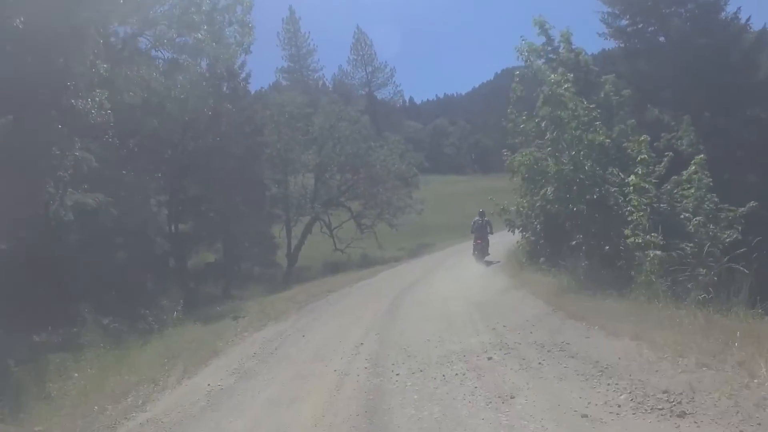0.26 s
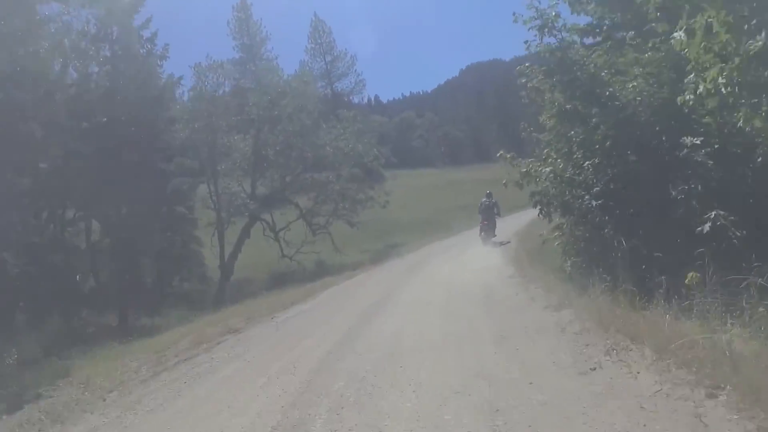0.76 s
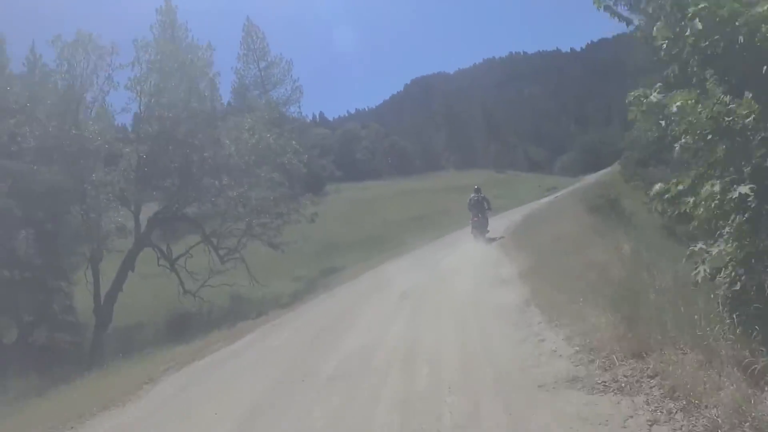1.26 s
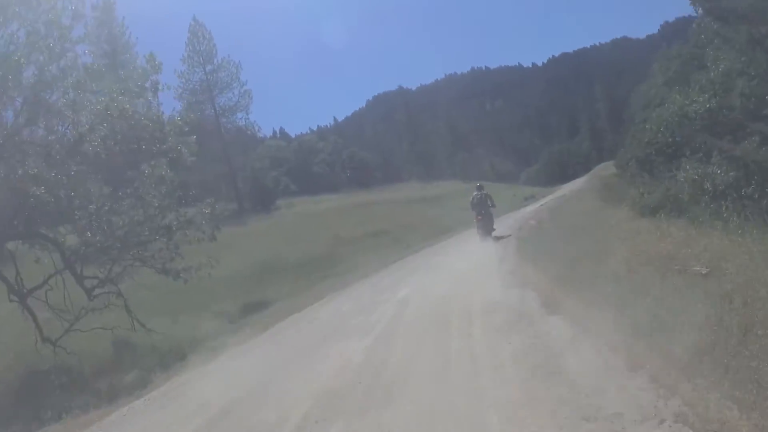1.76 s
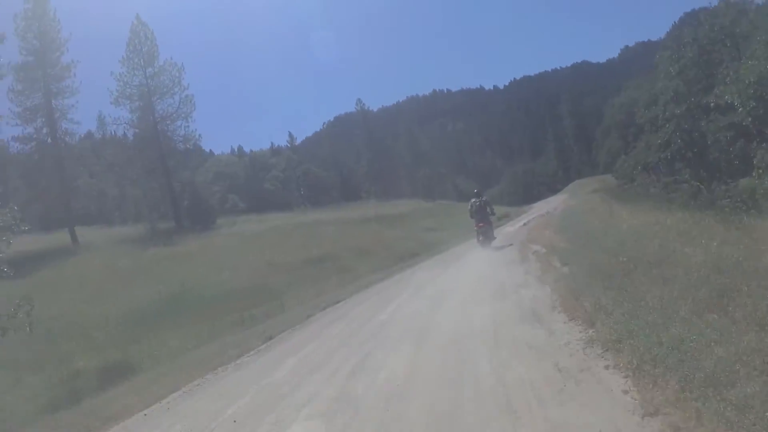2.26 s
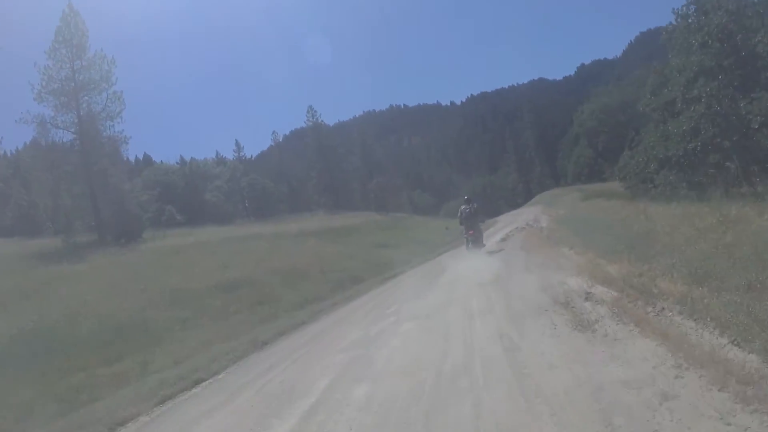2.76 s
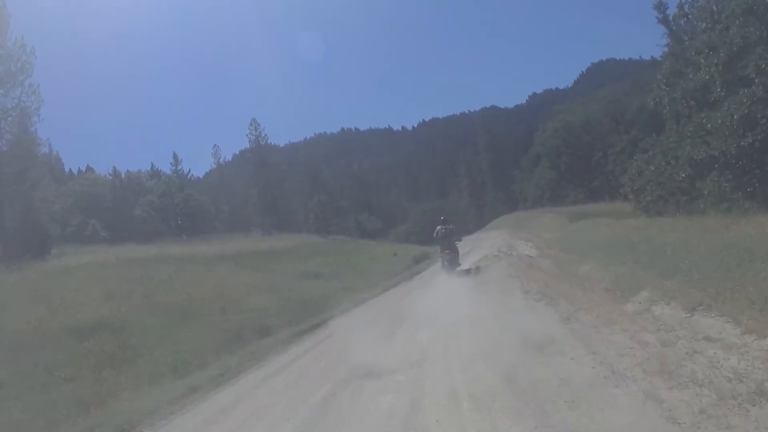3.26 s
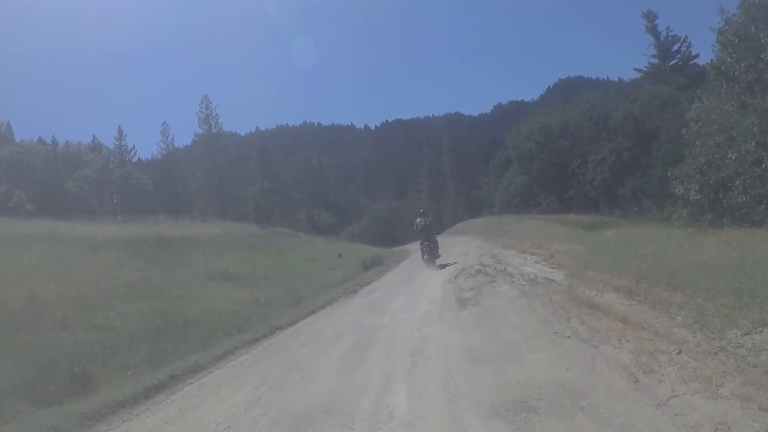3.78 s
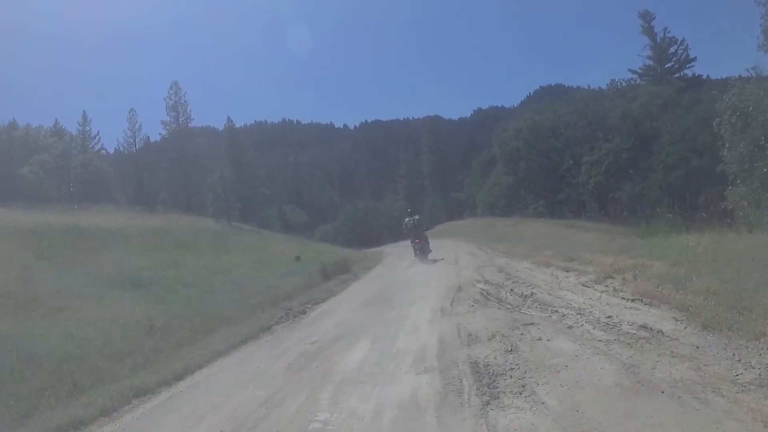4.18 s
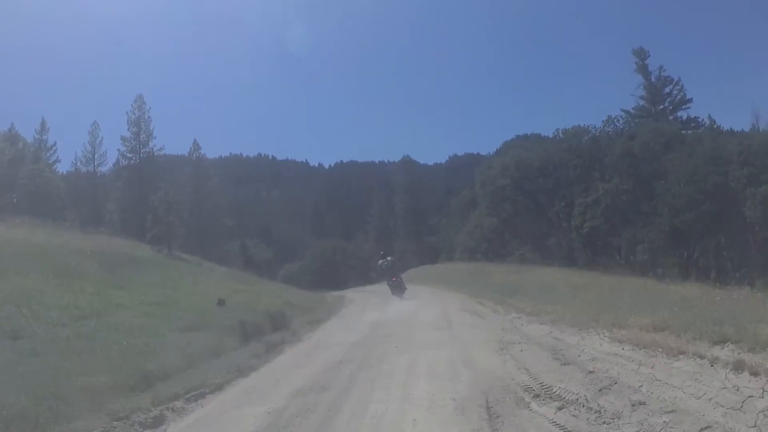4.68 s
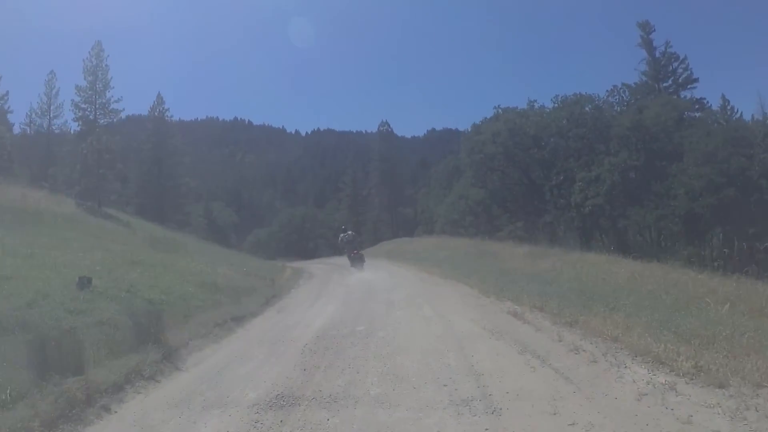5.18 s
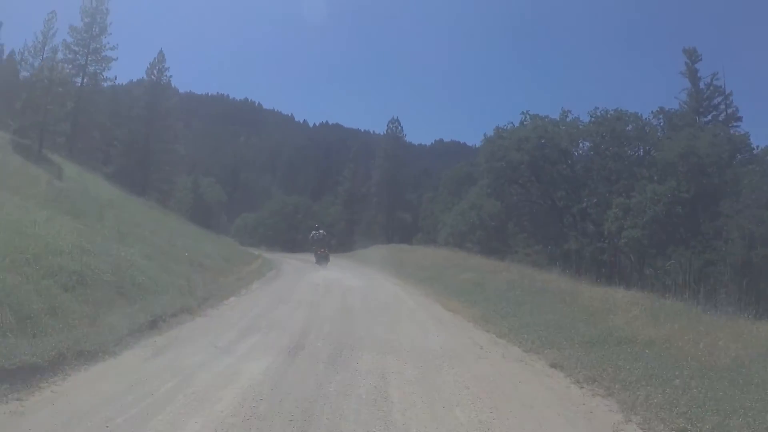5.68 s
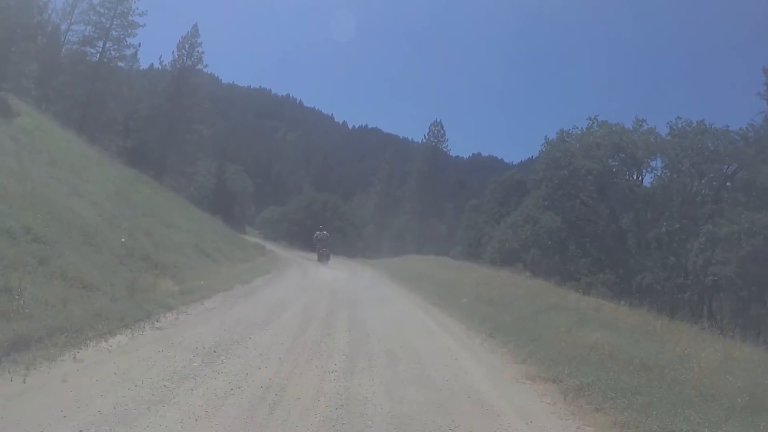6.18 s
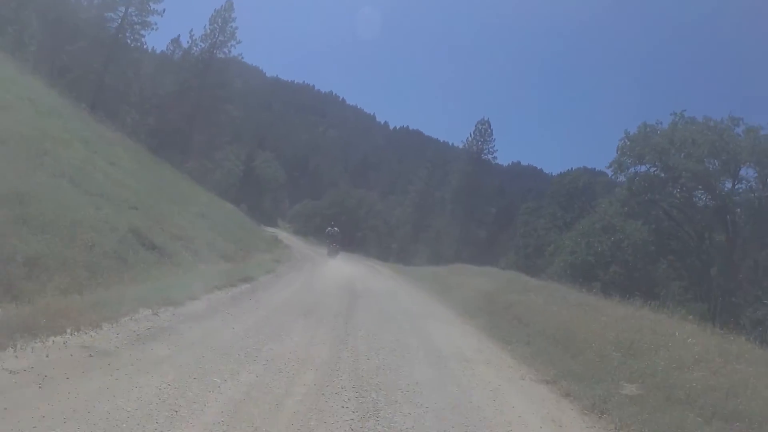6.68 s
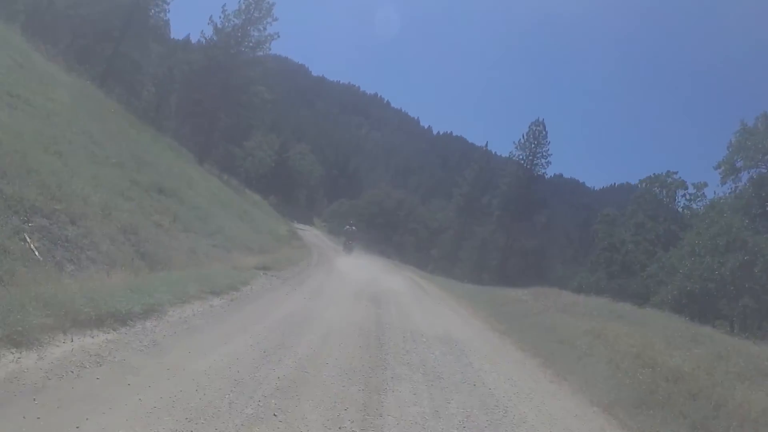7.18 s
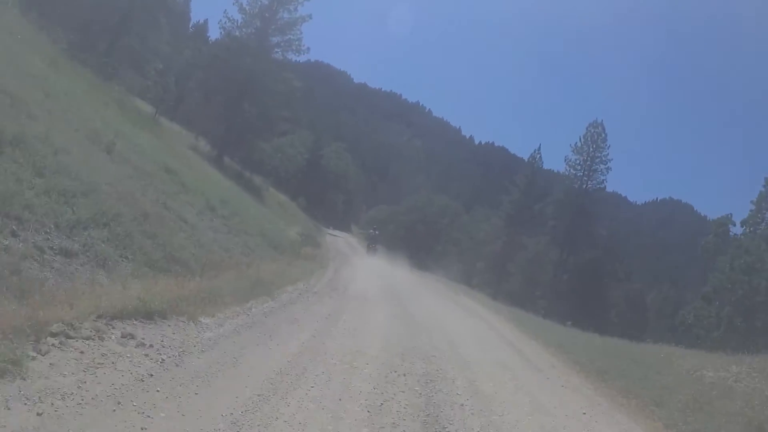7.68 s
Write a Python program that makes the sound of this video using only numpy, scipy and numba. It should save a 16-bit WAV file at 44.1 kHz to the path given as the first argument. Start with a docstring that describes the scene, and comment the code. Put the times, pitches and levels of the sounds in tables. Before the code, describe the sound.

Muffled motorcycle engine drone and low wind buffeting on gravel, constant dry rattling ticks, a few violent bumps, then engine pitch climbing.

```python
"""On a gravel trail, a camera in a closed housing rides on a single-cylinder trail bike.
Wind and frame rumble is shaped noise, stones and bumps are short swings, and the engine is a sum of
crank orders with a gear whine. Loud bumps make a gain control duck and creep back.
Dry ticks, knocks, hoots and short squeaks, made of noise bursts, resonances and chirps, ride on top."""
import sys
import numpy as np
from scipy import signal
from scipy.fft import rfft, irfft, next_fast_len
from scipy.io import wavfile
from scipy.ndimage import uniform_filter1d
from numba import njit

SR = 44100
rng = np.random.default_rng(int(sys.argv[2]) if len(sys.argv) > 2 else 0)


def transcribe(signal):
    """Save signal, clipped to [-1, 1], as a 16-bit WAV file at the path in sys.argv[1]."""
    frames = np.atleast_2d(signal).T
    limited = np.clip(frames, -1, 1)
    pcm = np.round(limited * 32767).astype(np.int16)
    wavfile.write(sys.argv[1], SR, pcm)


N = 350141

# wind buffeting: (time [s], level [dB], relative level of the bands below 50 Hz [dB])
BUFFETING = [(0, -21.5, 9.5), (.65, -18.5, 3), (1.2, -16.5, 6.5), (2.1, -18.5, 5), (3.4, -19.5, 5),
             (3.9, -21.5, 5), (4.3, -20, 2), (4.7, -18.5, 7.5), (5.2, -17.5, 0.5), (5.7, -14, 7.5),
             (6, -16.5, -13), (7.0, -17.5, -6), (7.94, -16.5, -3)]
# ticks at set times, loud and faint: (time [s], level before colouring [dB])
TIMED_TICKS = [(0.0188, -28.5), (0.0542, -41), (0.0675, -32), (0.166, -34), (0.198, -34), (0.2297, -38),
               (0.267, -35), (0.2887, -32), (0.3418, -28.5), (0.407, -29), (0.43, -38), (0.4998, -24.5),
               (0.562, -31), (0.6, -31), (0.6534, -23), (0.682, -37), (0.716, -28.5), (0.7636, -36),
               (0.785, -49), (0.84, -35), (0.8622, -24.5), (0.901, -21), (0.959, -39), (0.9828, -31.5),
               (1.012, -38), (1.037, -58), (1.049, -36), (1.08, -36), (1.122, -31), (1.16, -34),
               (1.213, -22.5), (1.276, -36), (1.3059, -36), (1.324, -40), (1.3448, -34), (1.3682, -25),
               (1.4664, -32.5), (1.491, -39), (1.5568, -25.5), (1.5827, -29), (1.626, -36), (1.6813, -22.5),
               (1.761, -30), (1.7808, -28.5), (1.8335, -30.5), (1.8763, -27), (1.898, -34), (1.9765, -36),
               (2.0113, -29), (2.0807, -31.5), (2.148, -25.5), (2.2395, -31.5), (2.2846, -34), (2.295, -39),
               (2.316, -46), (2.3356, -27), (2.367, -31), (2.392, -28), (2.4164, -41), (2.4405, -49),
               (2.502, -39), (2.6374, -29), (2.7287, -36), (2.773, -29), (2.798, -34.5), (2.8962, -28.5),
               (2.954, -36), (3.03, -35), (3.0485, -32), (3.0708, -32), (3.087, -33), (3.1, -35),
               (3.138, -46), (3.1484, -25.5), (3.2018, -27.5), (3.3053, -33), (3.3582, -28), (3.384, -42),
               (3.4122, -25.5), (3.465, -33), (3.616, -40.5), (3.7345, -32), (3.8607, -34), (3.9635, -40),
               (4.0016, -31), (4.0243, -33.5), (4.0803, -30.5), (4.108, -42), (4.259, -29), (4.3173, -33),
               (4.3503, -33.5), (4.3873, -43), (4.4085, -28.5), (4.44, -24.5), (4.4435, -27.5),
               (4.466, -34), (4.4775, -37), (4.491, -49), (4.54, -36), (4.545, -42), (4.664, -44),
               (4.7025, -24), (4.817, -24.5), (5.4272, -22.5), (5.6043, -23), (5.6095, -39), (0.9048, -26),
               (2.382, -42), (2.261, -40), (2.3575, -45), (4.5035, -33), (4.5264, -35), (4.5885, -32),
               (4.655, -30), (4.6992, -22.5), (4.7487, -43), (4.767, -50), (4.814, -21.5), (4.8835, -35.5),
               (4.9024, -52), (4.954, -28), (4.981, -36), (4.998, -35), (5.044, -39), (5.083, -45),
               (5.1163, -32), (5.1931, -32.5), (5.332, -42), (5.371, -27.5), (5.391, -34), (5.4245, -19.5),
               (5.449, -50), (5.4756, -53), (5.501, -53), (5.5165, -54), (5.4072, -42), (5.5374, -41),
               (5.553, -47), (5.5594, -46), (5.591, -38), (5.6015, -15.5), (5.679, -33.5), (5.716, -42),
               (5.7453, -30), (5.7858, -31), (5.8062, -24.5), (5.851, -34), (5.888, -29), (5.919, -26),
               (5.99, -26), (6.0277, -27.5), (6.0882, -27), (6.1546, -29), (6.225, -27), (6.263, -52),
               (6.288, -39), (6.343, -32), (6.3625, -31), (6.3935, -39), (6.6705, -39), (6.771, -32.5),
               (6.824, -39), (6.853, -23.5), (6.95, -35.5), (7.1087, -27), (7.119, -34), (7.1881, -26),
               (7.229, -52), (7.247, -46), (7.2574, -30), (7.315, -37), (7.33, -29.5), (7.448, -45),
               (7.5063, -34.5), (7.5512, -29), (7.6331, -29), (7.661, -35), (7.7151, -27), (7.7398, -24.5),
               (7.766, -36), (7.8485, -34), (7.9104, -33)]
LIMIT, CEILING = .62, .9  # amplitudes: threshold of the gain control, soft ceiling


def undb(db):
    """Amplitude ratio of a level in decibels."""
    return 10 ** (np.asarray(db) / 20)


def level(x, db):
    """Scale a signal to an RMS level."""
    return x * undb(db) / np.sqrt(np.mean(x ** 2))


def curve(table):
    """Linear interpolation in time of the columns of a table."""
    s, *columns = np.transpose(table)
    return [np.interp(np.arange(N) / SR, s, c) for c in columns]


def band(x, hz, width_hz):
    """Two-pole resonance with unit gain at its centre."""
    return signal.lfilter(*signal.iirpeak(hz, hz / width_hz, fs=SR), x)


def walk(rate):
    """Smoothed random steps: values held 1 / rate s, averaged twice; spread near 1."""
    k = int(SR / rate)
    steps = np.repeat(rng.standard_normal(N // k + 1), k)
    return 1.357 * uniform_filter1d(uniform_filter1d(steps, k), k)[:N]


def add(out, s, piece):
    """Superposition: mix a short sound in at time s."""
    i = int(s * SR)
    out[i:i + len(piece)] += piece[:N - i]


def chance(db, spread_db, count):
    """Random (time, level) rows, exponentially spread: most near db, a few up to three spreads louder."""
    s, size = rng.random((count, 2)).T
    return np.column_stack([s * N / SR, db - spread_db * np.log(1 - .95 * size)])


def housing_db(hz):
    """Resonant transmission: the lift or loss of the housing at each frequency."""
    # housing resonances: (centre [Hz], width [Hz], gain [dB])
    modes = [(36, 12, 3.5), (214, 13, 4), (501, 99, 7.5), (785, 24, 5), (1025, 130, 5.5), (1634, 170, 5),
             (2490, 87, 8), (3066, 220, 8), (5080, 560, 10.5), (7600, 3200, -14.5)]
    return sum(db / (1 + (2 * (hz - f) / w) ** 2) for f, w, db in modes)


def rumble():
    """Turbulent buffeting: gusts and shakes modulate all half-octave noise bands; each also flickers alone."""
    # wind and frame rumble in the housing: (frequency [Hz], relative spectral level [dB per Hz])
    spectrum = np.array([(12, -34.5), (20, 1.5), (60, 0), (125, -6), (206, -3.5), (242, -6.5), (302, -20.5),
                         (468, -22.5), (668, -31.5), (787, -30.5), (1610, -45.5), (2110, -55.5),
                         (5220, -68.5), (7870, -65.5), (11600, -73), (14000, -107)])
    bright_db_per_octave = 0.9  # above 250 Hz
    db, thud_db = curve(BUFFETING)
    size = next_fast_len(N)
    hz = np.maximum(np.arange(size // 2 + 1) * SR / size, 1)
    shape_db = np.interp(np.log(hz), np.log(spectrum[:, 0]), spectrum[:, 1])
    # the microphone's high-pass removes most sound below 30 Hz
    shape_db = shape_db + housing_db(hz) - 10 * np.log10(1 + (32 / hz) ** 6)
    noise = rfft(rng.standard_normal(size)) * undb(shape_db)
    shake_db = 1.3 * walk(35)
    flutter_db = 2.67 * walk(110)
    common_db = 6.0 * np.tanh((shake_db + flutter_db) / 5)  # softly bounded
    out = 0
    for octave in np.arange(4, 14.5, .5):  # log2 of the centre in Hz
        share = np.clip(1 - 2 * np.abs(np.log2(hz) - octave), 0, 1)
        colour_db = bright_db_per_octave * max(octave - np.log2(250), 0)
        colour_db = colour_db + thud_db * (octave < np.log2(50))
        own_db = 1.1 * walk(11)
        out = out + irfft(noise * share, size)[:N] * undb(common_db + own_db + colour_db)
    return level(out, 0) * undb(db)


def stones():
    """Impulsive excitation: tyres thump over stones in single low swings, many small and a few large."""
    smallest_db, spread_db = -8, 2.0  # before the swing's shape, against the buffeting; spread of sizes
    out, turn = np.zeros(N), np.arange(0, 1, 1 / 600)
    for s, size, pitch, side in rng.random((500, 4)):
        step = turn * 600 * 70 * 2 ** (2.0 * pitch) / SR  # 70 to 280 Hz
        swing = np.sin(2 * np.pi * step) * np.sin(np.pi * step) * (step < 1)
        stone_db = smallest_db - spread_db * np.log(1 - size)
        add(out, s * N / SR, np.sign(side - .5) * undb(stone_db) * swing)
    return out * undb(curve(BUFFETING)[0])


def bumps():
    """Damped oscillation: a hole throws the housing down and it swings for about a cycle and a half."""
    # bumps: (time [s], level before the envelope, relative to the limit [dB], swing frequency [Hz])
    holes = [(0.9003, 13.5, 204), (1.21, 5.5, 120), (1.423, 6, 87.3), (1.889, 3.5, 96.5), (2.076, 3.5, 85),
             (2.504, -3.5, 123), (3.095, -7.5, 76.4), (3.207, 4.5, 88), (4.146, 4.5, 59.6), (4.442, 2, 225),
             (4.698, 17.5, 115), (4.812, 12, 105), (4.962, 2.5, 53.8), (5.069, -5.5, 91),
             (5.423, 23.5, 122), (5.588, -11, 147.5), (5.5939, 8, 149), (5.6003, 19, 114),
             (5.792, -15, 77.4), (6.923, 3, 108), (7.327, 2.5, 110), (7.651, 3.5, 88)]
    out, t = np.zeros(N), np.arange(2000) / SR
    for s, over_db, hz in holes:
        rise = t * hz / .85
        envelope = rise * np.exp((1 - rise ** 5) / 5)
        add(out, s, -LIMIT * undb(over_db) * envelope * np.sin(2 * np.pi * hz * t))
    return out


def dips(events):
    """Transient displacement: a short low dip lies under each tick, deeper under a louder one."""
    base_db, share, half_width_s = -0.5, 0.51, 0.0029  # share of the tick's level in dB
    out, t = np.zeros(N), np.arange(-500, 500) / SR / half_width_s
    for s, db in events:
        dip = (1 - t ** 2) * np.exp(-t ** 2 / 2)
        add(out, max(s - 500 / SR, 0), -undb(base_db + share * db) * dip)
    return out


def cracks(events, fade_s, colour, sharp=1.02):
    """Transient excitation of resonances: noise swells to a snap and fades; loud ones last longer, brighter."""
    lead_s = .002  # swell before the snap
    snap = int(lead_s * SR)
    out, t = np.zeros(N), np.arange(600) / SR
    noises = rng.standard_normal((len(events), 600))
    characters = rng.random((len(events), 2))
    for (s, db), crack, (long, dull) in zip(events, noises, characters):
        loud = np.clip((db + 30) / 15, 0, 1)
        fade = fade_s * (.6 + .8 * long + .3 * loud)
        crack = crack * np.exp(-np.abs(t - lead_s) / np.where(t < lead_s, 0.32 * fade, fade))
        crack[snap] = sharp * (1 - .5 * loud) * np.sqrt(np.sum(crack ** 2))
        blur = 1 + int((1.3 + 3.7 * dull) * (1 - loud))  # samples
        crack = uniform_filter1d(crack / crack[snap], size=blur)
        add(out, max(s - lead_s, 0), undb(db) * crack)
    # two passes make each resonance steep
    return sum(undb(d) * band(band(out, f, w), f, w) for f, w, d in colour)


def ticks(events):
    """Broadband transient: short dry ticks of noise a few milliseconds long."""
    # tick resonances: (centre [Hz], width of each pass [Hz], gain [dB])
    tick_modes = [(720, 500, 26), (1254, 260, 28), (2030, 1700, 19), (3300, 2810, 13.5), (5180, 5000, 4),
                  (8750, 2400, 5), (11800, 1900, -2.5)]
    return cracks(events, 0.0012, tick_modes, sharp=1.3)


def knocks(events):
    """Soft-contact impact: loose parts knock on the housing; a weaker second knock follows 6 ms later."""
    # knock resonances: (centre [Hz], width of each pass [Hz], gain [dB])
    knock_modes = [(263, 250, 36), (495, 250, 30), (782, 265, 30.5), (1000, 720, 21), (1435, 600, 18)]
    second_s, second_db, soft_hz = 0.0063, -14, 1480  # delay, relative level, low-pass corner
    echo_knocks = np.add(events, [second_s, second_db])
    echo_knocks = echo_knocks[echo_knocks[:, 0] < N / SR]
    knock = cracks(np.vstack([events, echo_knocks]), .0019, knock_modes, sharp=.7)
    return signal.lfilter(*signal.butter(2, soft_hz, fs=SR), knock)


def hoots(events):
    """Resonance: the housing buzzes near 790 Hz for a few hundredths of a second."""
    out, t = np.zeros(N), np.arange(3000) / SR
    for s, db in events:
        add(out, s, undb(db) * t / 0.017 * np.exp(1 - t / 0.0086))
    noise = rng.standard_normal(N)
    narrow = level(band(band(noise, 790, 190), 790, 190), -5)
    broad = level(band(band(noise, 900, 900), 900, 900), -11)
    return out * (narrow + broad)


def squeaks(events):
    """Frictional vibration: a small tick and a short grainy chirp, as of plastic rubbing in the mount."""
    out, t = np.zeros(N), np.arange(700) / SR
    for s, db in events:
        add(out, s, undb(db) * t / 0.00092 * np.exp(1 - t / 0.0019))
    grain = 1 + 2.0 * band(rng.standard_normal(N), 400, 800)
    turns = np.cumsum(5400 + 150 * walk(300)) / SR
    chirp = out * grain * np.sin(2 * np.pi * turns)
    return chirp + cracks(np.add(events, [0, 6]), .0008, [(5300, 2500, 5)])


def crunches():
    """Granular texture: ten small ticks and knocks per crunch as a tyre ploughs loose gravel."""
    # crunches: (time [s], length [s], upper tick level before colouring [dB])
    flurries = [(.16, 0.076, -47), (.86, 0.046, -49), (1.3, 0.095, -38.5), (1.56, 0.069, -42.5),
                (2.27, 0.036, -41.5), (2.33, 0.048, -43), (2.94, .07, -49), (4.95, 0.083, -49),
                (5.37, 0.042, -52), (6.63, 0.068, -45), (7.24, 0.062, -51), (7.7, 0.075, -44.5)]
    knock_db = 13.5  # knocks over ticks
    s, length, db = np.repeat(flurries, 10, axis=0).T
    when, late, size = rng.random((len(s), 3)).T
    small = np.column_stack([s + length * when, db - 8 * size])
    offset = np.column_stack([.004 * late, np.full(len(s), knock_db)])
    return ticks(small) + knocks(small + offset)


def rattle():
    """Random superposition: a middling patter of ticks over a faint crackle, with knocks, hoots and squeaks."""
    middling = chance(-49, 2.2, count=160)
    crackle = [chance(-56.5, 1.5, count=350), chance(-62.5, 2.2, count=800)]
    faint_knocks = knocks(chance(-33.5, 2.2, count=30))
    faint_hoots = hoots(chance(-45.5, 3.2, count=40))
    faint_squeaks = squeaks(chance(-65.5, 1.9, count=90))
    return ticks(np.vstack([middling, *crackle])) + faint_knocks + faint_hoots + faint_squeaks


def engine():
    """Harmonic synthesis: crank orders with staggered phases form a drawn-out throb; a crank gear whines."""
    # engine course: (time [s], crank turns [Hz], relative level of the orders [dB], throttle [0-1])
    course = [(0, 61, -23, 0), (.55, 64.8, -21, 0), (1.05, 63, -21, 0), (1.4, 65.3, -21.5, 0),
              (2, 63.8, -24, 0), (2.6, 60.8, -21, .3), (3.2, 58.3, -23, .3), (3.6, 56, -20, 0),
              (4.1, 54.2, -21, 0), (4.35, 55, -24, 0), (4.75, 53.3, -22, 0), (5.25, 56, -20, .2),
              (5.85, 58.7, -19.5, .4), (6.2, 60.3, -21, .5), (6.6, 63.7, -21, .65), (7, 68, -21, .9),
              (7.4, 71.8, -21.5, 1), (7.94, 78.3, -22.5, 1)]
    # one firing every second turn gives half orders: (multiple of crank turns [1], relative level [dB])
    orders = [(.5, -8), (1, 1), (1.5, -7), (2, -1), (2.5, -6), (3, -5.5), (3.5, -10), (4, -13), (4.5, -18),
              (5, -18), (5.5, -21), (6, -19), (6.5, -22), (7, -21), (7.5, -20), (8, -19), (8.5, -22),
              (9, -26)]
    gear_teeth, whine_db, whine_lift_db = 22, -66, 10  # throttle shut; gain at full throttle
    load_lift_db = 5  # of order 3 at full throttle; more above order 4
    hz, db, throttle = curve(course)
    turns = np.cumsum(hz * (1 + .003 * walk(8))) / SR
    block, low_hz = 0, np.arange(1000.)
    for k, order_db in orders:
        load_db = load_lift_db * throttle * (min(k - 1, 2) / 2 + max(k - 4, 0) / 2.5)
        case_db = np.interp(k * hz, low_hz, housing_db(low_hz))
        # the case wall stops the higher orders
        case_db = case_db - 10 * np.log10(1 + (k * hz / 250) ** 6)
        gain = undb(order_db + load_db + case_db + 1.7 * walk(3))
        block = block + gain * np.sin(2 * np.pi * k * turns + .5 * k ** 2)
    whine_gain = undb(whine_db + whine_lift_db * throttle ** 2 + 1.9 * walk(30))
    whine = whine_gain * np.sin(2 * np.pi * gear_teeth * turns)
    return block * undb(db) + whine


def scene():
    """Superposition of the sources ahead of the gain control, with a soft 4 ms onset."""
    onset = np.minimum(np.arange(N) / (.004 * SR), 1)
    ride = rumble() + stones() + bumps() + dips(TIMED_TICKS)
    return (onset * (ride + crunches() + rattle() + engine()))[None]


@njit
def duck(x, top, attack, release, hold):
    """Peak-following gain control: drops fast when peaks pass top, waits, then creeps back."""
    gain, e, wait = np.empty(len(x)), top, 0.
    for i in range(len(x)):
        if abs(x[i]) > e:
            e, wait = e + attack * (abs(x[i]) - e), hold
        elif wait > 0:
            wait -= 1
        else:
            e = max(top, e * release)
        gain[i] = top / e
    return gain


def record(dry):
    """Dynamic compression with look-ahead; the timed dry sounds join after it; soft saturation and a low-pass."""
    # knocks that ring the housing: (time [s], level before colouring [dB])
    timed_knocks = [(0.251, -45), (0.341, -35), (0.404, -26), (0.498, -30), (0.652, -22.5), (0.861, -24),
                    (0.904, -16), (0.987, -22.5), (1.077, -27), (1.213, -27.5), (1.324, -22), (1.556, -42),
                    (1.583, -26.5), (1.682, -24), (2.149, -42), (2.352, -25), (2.904, -26), (3.148, -24.5),
                    (3.306, -29.5), (3.861, -35.5), (4.26, -25), (4.408, -30), (4.4445, -16), (4.698, -17),
                    (4.813, -15), (4.964, -26), (5.082, -28.5), (5.396, -26), (5.426, -14), (5.602, -12),
                    (5.748, -28), (5.913, -26.5), (6.015, -36), (6.226, -35), (6.287, -33), (6.639, -26),
                    (6.77, -35), (6.853, -38), (7.768, -33)]
    # short hoots of the housing: (time [s], level before the envelope [dB])
    timed_hoots = [(0.17, -22.5), (0.456, -29), (0.859, -38), (1.588, -29), (2.358, -47), (2.596, -28.5),
                   (2.735, -38), (2.958, -30), (2.972, -31), (4.076, -30), (4.775, -30.5), (4.965, -21),
                   (5.394, -23.5), (5.569, -23), (5.743, -36), (5.886, -39), (6.915, -32)]
    # squeaks at set times: (time [s], level before the envelope [dB])
    timed_squeaks = [(0.455, -60), (0.529, -60), (0.683, -57), (1.3065, -56), (1.392, -44), (2.0535, -57),
                     (2.2388, -55), (2.522, -62), (2.5375, -55), (2.8625, -59), (3.0145, -53),
                     (4.4283, -50), (4.5677, -52), (4.6169, -53), (4.6875, -54), (4.8, -57), (4.928, -61),
                     (4.9821, -46.5), (5.1617, -53), (5.4137, -50), (5.591, -52), (6.1834, -55),
                     (6.512, -52), (6.6693, -50.5), (7.142, -56)]
    attack_s, release_db_per_s, hold_s, top_hz = 0.000089, 200, 0.054, 14600
    ahead = np.roll(dry[0], -30)  # samples
    gain = duck(ahead, LIMIT, 1 / (attack_s * SR), undb(-release_db_per_s / SR), hold_s * SR)
    smooth = uniform_filter1d(gain, size=60)
    timed = ticks(TIMED_TICKS) + knocks(timed_knocks) + hoots(timed_hoots) + squeaks(timed_squeaks)
    wet = CEILING * np.tanh((dry * smooth + timed) / CEILING)
    return signal.sosfilt(signal.ellip(8, .2, 60, top_hz, fs=SR, output="sos"), wet)


dry = scene()
out = record(dry)
transcribe(out)
```